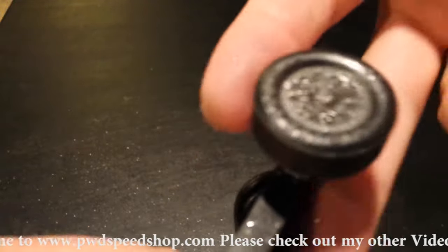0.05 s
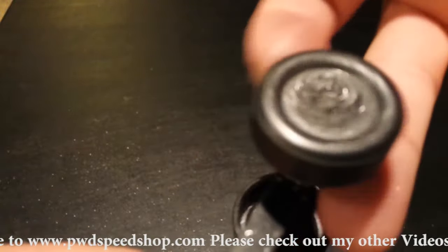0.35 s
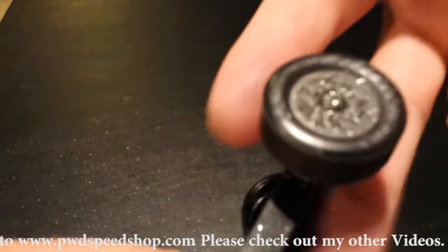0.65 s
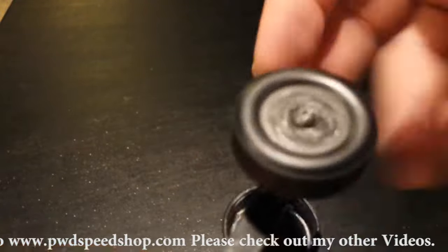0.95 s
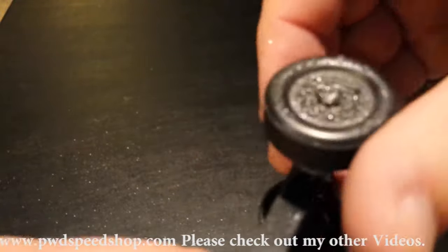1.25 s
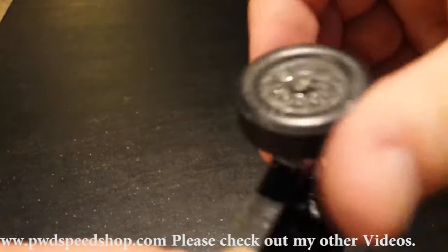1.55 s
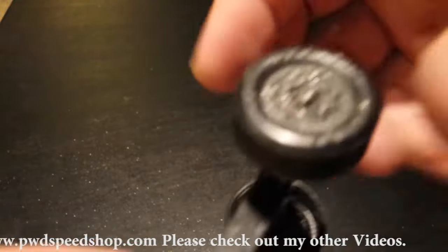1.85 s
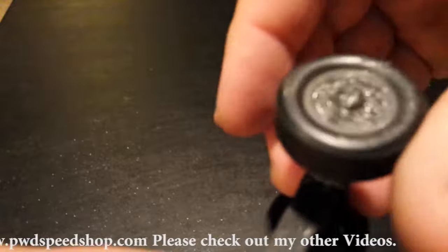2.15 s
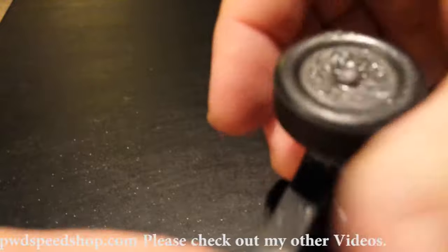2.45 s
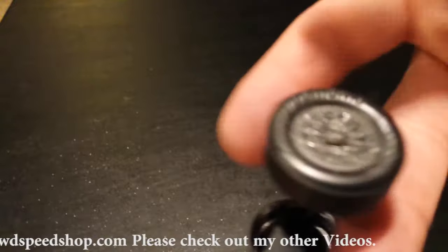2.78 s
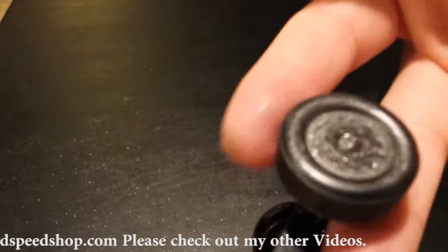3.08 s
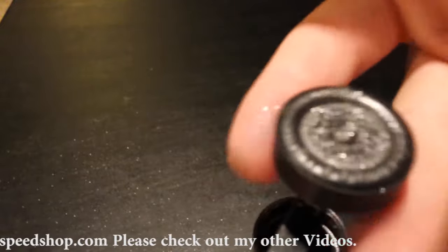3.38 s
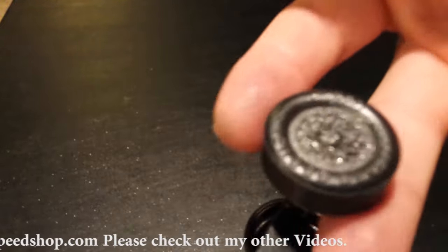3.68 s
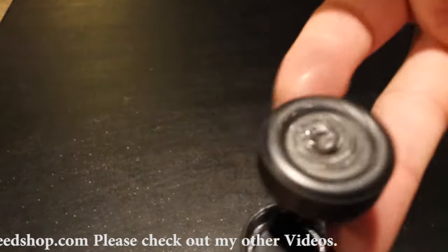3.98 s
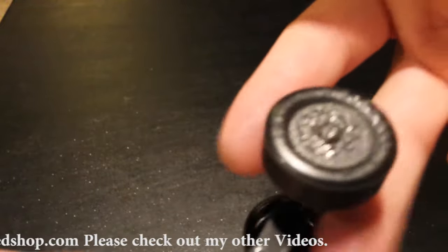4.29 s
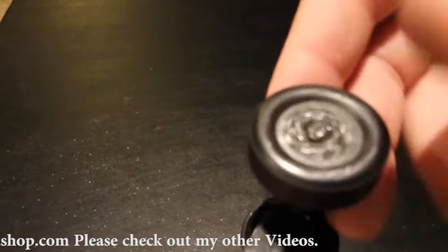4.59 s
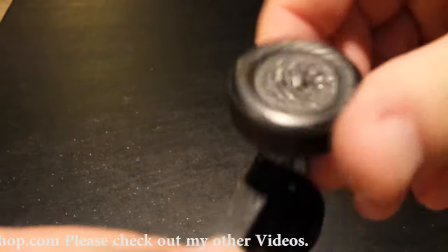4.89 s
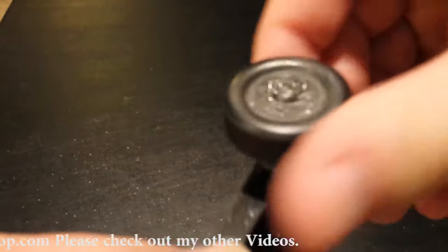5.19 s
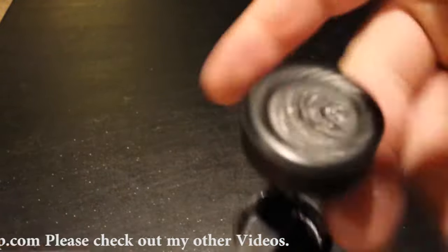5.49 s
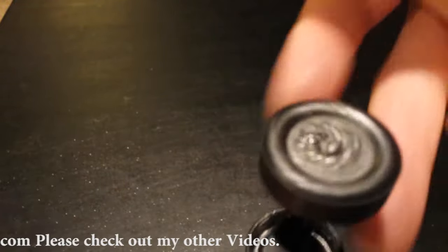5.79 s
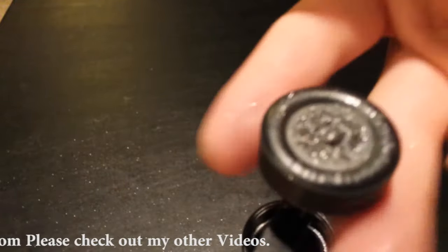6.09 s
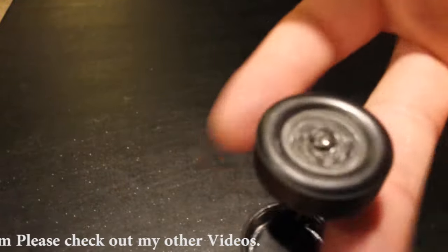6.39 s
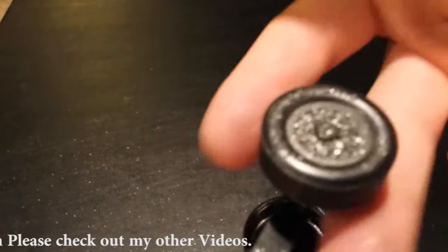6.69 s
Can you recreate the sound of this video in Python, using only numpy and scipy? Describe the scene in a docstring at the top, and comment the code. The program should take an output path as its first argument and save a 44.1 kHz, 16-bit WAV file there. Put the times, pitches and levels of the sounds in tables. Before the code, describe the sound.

Close, sharp irregular clicks of a little plastic wheel knocked along its axle, with gritty powder ticks and one brief soft spin.

```python
"""A plastic wheel worked with graphite

A small plastic wheel sits on a steel axle with dry graphite, close to a camera in a small room.
A fingertip knocks the wheel up its axle; it drops back, rings and bounces. In between, fingers turn it,
the flakes crunch and tick, and once it spins freely with a soft rumble that sinks as it slows."""
import sys
import numpy as np
from scipy import signal
from scipy.fft import rfft, irfft, next_fast_len
from scipy.io import wavfile
from scipy.ndimage import uniform_filter1d, map_coordinates

SR = 44100
rng = np.random.default_rng(int(sys.argv[2]) if len(sys.argv) > 2 else 0)


def transcribe(u):
    """Save the signal u as a 16-bit wav file named by the first command-line argument.

    u: samples, shape (n,) or (channels, n), limited to [-1, 1]; the rate is SR.
    q: integer samples, one column per channel.
    """
    v = np.clip(np.atleast_2d(u).T, -1, 1)
    q = np.round(v * 32767).astype(np.int16)
    wavfile.write(sys.argv[1], SR, q)


N = 297383

# the wheel's ringing tones and how hard each touch drives them: f/Hz, width/Hz, lift/dB, drop/dB, tick/dB
WHEEL = [(1802, 360, 9.5, 14, 12.5), (2167, 46, 8.5, 6, 0.5), (2740, 80, 13, 7.5, 8),
         (3078, 380, 10.5, 13.5, 8), (3776, 95, 2, 16.5, 9.5), (3892, 580, 13, -5, 7),
         (5110, 800, 10.5, 11, 5.5), (6334, 930, 16, 10.5, 2.5), (7430, 760, 12, -2.5, 4.5),
         (8474, 1100, 0, 2.5, 5), (11310, 290, -8, 2, -9), (13650, 530, -14.5, -19, -10)]
# the sound opens on a brief loud rush, then a finger lands on the rim and turns the wheel: t/s, length/s,
# rubbing/dB, hand rumble/dB
STROKES = [(0, 0.041, -50.5, -62), (0.166, 0.093, -57.5, -72.5), (0.279, 0.15, -56.5, -66),
           (0.537, 0.14, -56, -58.5), (0.725, 0.15, -53, -65), (1.076, 0.27, -56.5, -69),
           (1.409, 0.055, -57, -81), (1.546, 0.24, -61.5, -74.5), (1.763, 0.039, -58, -65),
           (2.049, 0.15, -57.5, -65), (2.246, 0.081, -62.5, -74.5), (2.359, 0.077, -57, -70),
           (2.511, .06, -57.5, -67.5), (2.93, 0.087, -61, -63), (3.067, 0.24, -57, -63.5),
           (3.465, 0.32, -61.5, -65), (3.754, 0.16, -57.5, -67), (3.997, .1, -57, -67.5),
           (4.274, 0.15, -56, -68.5), (4.488, 0.17, -57.5, -65), (4.833, 0.3, -53.5, -67.5),
           (5.213, 0.088, -67.5, -85), (5.326, .11, -59, -74.5), (5.498, 0.087, -59, -67.5),
           (5.735, 0.05, -48, -62), (6.294, 0.17, -60, -70.5), (6.685, 0.066, -56, -68)]


def amp(db):
    """Turn decibels into a gain."""
    return 10 ** (np.asarray(db) / 20)


def unit(x):
    """Scale to an average (rms) level of 1."""
    return x / np.sqrt(np.mean(x ** 2) + 1e-20)


def along(points, hz):
    """Read between (f/Hz, value) points on a log frequency axis."""
    f, values = np.transpose(points)
    return np.interp(np.log(hz + 1), np.log(f + 1), values)


def curves(rows):
    """One value per sample for each column after the time."""
    times, *columns = np.transpose(rows)
    return [np.interp(np.arange(N) / SR, times, column) for column in columns]


def wobble(rate):
    """A smooth curve through `rate` random values a second."""
    return map_coordinates(rng.standard_normal(int(N * rate / SR) + 4), [np.arange(N) * rate / SR])


def filtered(x, response):
    """Filter x with a response given as a function of frequency."""
    size = next_fast_len(x.shape[-1] + 8192)
    return irfft(rfft(x, size) * response(np.fft.rfftfreq(size, 1 / SR)), size)[..., :x.shape[-1]]


def causal(db):
    """The fastest-starting response that has these gains on an FFT grid."""
    cepstrum = irfft(np.log(amp(db)))
    half = len(cepstrum) // 2
    return np.exp(rfft(cepstrum * np.r_[1, np.full(half - 1, 2), np.zeros(half)]))


def add(track, s, x):
    """Mix x into the track at s seconds."""
    part = track[..., max(round(s * SR), 0):][..., :x.shape[-1]]
    part += x[..., :part.shape[-1]]


def rush(spectrum, alike):
    """Stereo noise shaped by (f/Hz, level/dB) and (f/Hz, left-right likeness) points."""
    def response(hz):
        angle = np.arccos(np.clip(along(alike, hz), -1, 1)) / 2
        return amp(along(spectrum, hz)) * [np.cos(angle), np.sin(angle)]
    mid, side = filtered(rng.standard_normal((2, N)), response)
    return unit(np.array([mid + side, mid - side]))


def patchy(x, depth_db):
    """Let the colour of a noise shift in patches about 1 kHz wide and 25 ms long."""
    spectra = signal.stft(x, nperseg=256)[2]
    patches = uniform_filter1d(rng.standard_normal(spectra.shape[1:]), size=7, axis=0)
    patches = uniform_filter1d(patches, size=8, axis=1)
    return signal.istft(spectra * amp(depth_db * unit(patches)), nperseg=256)[1][:, :N]


def background(hand, quiet_db):
    """The hands rumble softly with each stroke over the still room."""
    # colour of the hand rumble: f/Hz, level/dB
    handling = [(40, -18.5), (100, -2.5), (200, -3), (320, -3.5), (480, -7), (620, -10.5), (1200, -16),
                (2500, -52)]
    # colour of the still room: f/Hz, level/dB
    quiet = [(15, -23.5), (27, -9.5), (36, 1.5), (50, -8), (150, -6.5), (300, -13), (450, -12.5),
             (700, -18), (1200, -21.5), (4000, -22.5), (8000, -21.5), (14300, -22.5), (16000, -54)]
    # how alike the room sounds left and right: f/Hz, likeness (1 = the same)
    alike = [(60, -0.27), (240, 0.06), (950, -0.26), (3770, -0.16), (15000, -0.0072)]
    return hand * rush(handling, [(200, 0.79)]) + amp(quiet_db) * rush(quiet, alike)


def hums():
    """Two thin, wavering tones hang in the room; the upper one fades faster."""
    # the room's hums: f/Hz, starting level/dB, fade/(dB per s)
    tones = [(313, -78.5, 0.9), (456, -71.5, 6)]
    t = np.arange(N) / SR
    return sum(amp(db - fade * t) * unit(np.sin(2 * np.pi * hz * t + 0.65 * wobble(10)))
               for hz, db, fade in tones)


def room(x, wet_db, wall_db, build_s):
    """Desk and walls echo, along with a soft tail that changes as the hands move."""
    # the wheel aims its main ring at the microphone, so less spills into the room: f/Hz, gain/dB
    spill = [(1500, 2), (3000, -1), (5000, 0.5), (6200, -4.5), (7200, -1), (9000, -2)]
    # how long the tail takes to fall by 60 dB (its t60): f/Hz, t60/s
    decay = [(200, 0.3), (2000, 0.25), (6000, 0.26), (12000, 0.14)]
    # echoes off desk and walls: delay/s, level/dB
    walls = [(.0092, -17.5), (0.0197, -20.5), (0.0215, -28), (0.0657, -40.5), (0.0737, -41.5)]
    out, hop = np.zeros((2, N)), SR // 4
    x = filtered(x, lambda hz: amp(along(spill, hz)))
    for start in range(0, N, hop):
        hz, t, noise = signal.stft(rng.standard_normal((2, SR // 2)), SR, nperseg=256)
        fading = noise * amp(-60 * t / along(decay, hz)[:, None])
        tail = signal.istft(fading * np.minimum(t / build_s, 1), SR, nperseg=256)[1]
        tail = amp(wet_db) * tail / np.linalg.norm(tail[0])
        for delay, db in walls:
            scatter = rng.standard_normal((2, 160)) * np.exp(-np.arange(160) / 35)
            add(tail, delay, amp(db + wall_db) * scatter / np.linalg.norm(scatter[0]))
        add(out, start / SR, signal.fftconvolve(x[:, start:start + hop], tail, axes=1))
    return out


def ports(x):
    """The microphone's two openings each hear the wheel with their own colour and delay."""
    # how loud the left is against the right: f/Hz, gain/dB
    shade = [(200, 6), (1700, -2.5), (2200, 5.5), (3200, -12.5), (4200, 2.5), (5200, 1), (6400, -0.5),
             (7400, -10.5), (9000, -19), (11400, -16), (14000, -14.5)]
    # how far the left trails the right: f/Hz, lag/rad
    lag = [(300, 0.73), (800, 0.21), (1500, 3.565), (4000, 3.77), (5500, 4.63), (7000, 7.65), (10000, 8.2),
           (14000, 11)]
    left = lambda hz: amp(along(shade, hz)) * np.exp(-1j * along(lag, hz))
    return filtered(x, lambda hz: np.array([left(hz), np.ones(len(hz))]))


def wheel_db(hz, drive_db, scatter_db):
    """How strongly the wheel rings at each frequency; every touch varies it a little."""
    # the bare snap between the ringing tones: f/Hz, level/dB
    snap = [(25, -36), (100, -17.5), (500, -2), (1000, 0.5), (1400, 6), (2400, 1.5), (3500, -14),
            (6000, -4.5), (10200, -20), (12500, -23), (15000, -25.5)]
    centre, width = np.transpose(WHEEL)[:2, :, None]
    heights = amp(drive_db + scatter_db * rng.standard_normal(len(WHEEL)))[:, None]
    peaks = heights / (1 + ((hz - centre) / width) ** 2 * 2)
    return 10 * np.log10(np.sum(peaks ** 2, axis=0) + amp(along(snap, hz)) ** 2)


def contact(drive_db, knock_db, edge_db, chatter_db, chatter_t60, size=4096):
    """One click: a snap and a brief chatter of the touching faces ring the wheel."""
    t, hz = np.arange(size) / SR, np.fft.rfftfreq(size, 1 / SR)
    grit = rng.standard_normal(size) + 1.01 * rng.standard_normal((2, size))
    grit *= amp(-60 * t / chatter_t60)
    chatter = rfft(grit / np.linalg.norm(grit[0])) * hz / np.hypot(hz, 900)  # too fine to carry bass
    force = 1 + amp(chatter_db) * chatter
    # where the rim lands sets the share of low knock and of sharp edge
    tilt = [(500, knock_db / 2), (1050, knock_db), (3000, knock_db), (4600, 0), (6500, 0), (7800, edge_db)]
    body = causal(wheel_db(hz, drive_db, scatter_db=1) + along(tilt, hz))
    return unit(ports(irfft(force * body))) * np.sqrt(.01 * SR / size)  # the energy of 10 ms at level 1


def strokes(levels_db, release_t60, grip_s=.025, swell_db=1.5):
    """Finger pressure: each stroke grips, presses harder while it lasts and lets go."""
    out = np.zeros(N)
    for (s, length, *_), db in zip(STROKES, levels_db):
        t = np.arange(int((length + release_t60) * SR)) / SR
        hold_db = swell_db * (np.minimum(t / length, 1) - .5)
        release_db = -60 * np.maximum(t - length, 0) / release_t60
        add(out, s, np.minimum(t / grip_s, 1) * amp(db + hold_db + release_db))
    return out


def spin(chatter_db):
    """The spinning wheel rumbles on its axle; its rough chatter sinks with the speed."""
    # the free spin: t/s, rumble level/dB, chatter f/Hz
    coasting = [(4.77, -89.5, 567), (4.82, -60.5, 540.8), (4.9, -66, 470), (4.97, -61, 446.4),
                (5.06, -66, 397), (5.2, -88, 360)]
    level_db, chatter_hz = curves(coasting)
    phase = 2 * np.pi * np.cumsum(chatter_hz * (1 + .07 * wobble(130))) / SR
    chatter = unit(np.sin(phase) + 1.1 * np.sin(phase / 2)) * amp(2.2 * wobble(55))
    colour = [(60, -37), (150, -1.0), (220, 9.0), (400, 4.5), (700, -13.0), (1300, -46.5), (4000, -73)]
    rumble = rush(colour, alike=[(300, 0.89)])
    return amp(level_db) * (rumble + amp(chatter_db) * chatter)


def crunch(rub, hiss_db, grit_db, grains_per_s, spread_db):
    """Skin slides on powder in uneven scratches while tiny flakes break in clumps and ring the wheel."""
    # colour of skin rubbing on powder: f/Hz, level/dB
    colour = [(350, -47.5), (600, -12.5), (1010, -13), (1310, -9), (1700, -10), (2400, -14), (3430, -4),
              (3730, -6), (4710, -13), (7730, 1), (9000, -2.5), (10000, -7.5), (12200, -15), (13900, -10.5),
              (14700, -28.5), (16000, -75.5)]
    *_, tick_db = np.transpose(WHEEL)
    skin = patchy(rng.standard_normal(N) + 1.8 * rng.standard_normal((2, N)), depth_db=1.5)
    scratch_db = 1.8 * wobble(50) + 1.8 * wobble(370)
    hiss = unit(ports(filtered(skin, lambda hz: amp(along(colour, hz)))) * amp(scratch_db))
    breaks = rng.random(N) < grains_per_s / SR * amp(6 * wobble(35))
    flakes = breaks * rng.choice([-1, 1], N) * amp(spread_db * np.minimum(rng.exponential(size=N), 3))
    grit = unit(ports(filtered(flakes, lambda hz: amp(wheel_db(hz, tick_db, scatter_db=7.5)))))
    return rub * (amp(hiss_db) * hiss + amp(grit_db) * grit)


def cracks(rub, per_s, gain_db, spread_db, knock_db, edge_db):
    """Flakes crack under the finger, each in its own colour and louder the harder it presses."""
    *_, tick_db = np.transpose(WHEEL)
    out = np.zeros((2, N))
    for when, strength, colour in rng.random((int(per_s * N / SR), 3)):
        at, swing_db = int(when * N), 12 * (colour - .5)
        click = contact(tick_db, knock_db - swing_db, edge_db + swing_db, chatter_db=4, chatter_t60=.006)
        add(out, at / SR, rub[at] * amp(gain_db + spread_db * (strength - 1.0)) * click)
    return out


def ticks():
    """The wheel scuffs its axle and crushes the larger flakes: mostly chatter, little snap."""
    # each scuff or broken flake: t/s, level/dB, low knock/dB, sharp edge/dB
    scuffs = [(.004, -31.5, -2, 2), (0.5908, -41, -1, 1), (1.097, -51.5, 4, 10), (1.1438, -37.5, 4, 3),
              (1.2867, -40, -25, 12.5), (1.73, -47, 0, 16), (1.766, -37, -2.5, 8), (1.8143, -36, 5, -3),
              (1.8228, -37.5, 2, 1), (2.088, -40.5, 1.5, 10.5), (2.1064, -32.5, -8, -9.5),
              (2.2521, -40, -2, -7), (2.4251, -50.5, 1.5, -9), (2.5415, -46, -3, 13),
              (2.5493, -35.5, 8, -8), (2.5946, -42.5, 0, -20), (4.068, -41, -20, 15), (4.388, -44, -1, -7),
              (4.542, -40.5, -31, -1), (4.803, -52, 4.5, 5), (4.834, -49.5, -11, 9), (4.8941, -36, 0, 0),
              (4.98, -32.5, -7.5, -1), (4.9963, -45, -11, 30), (5.5665, -40, 3, -5),
              (5.5723, -40.5, 0.5, -20), (5.795, -37, -6.5, 3), (6.3492, -36, -9, 13),
              (6.4133, -37.5, -15, 14), (6.7084, -40, 1, -3.5)]
    *_, tick_db = np.transpose(WHEEL)
    out = np.zeros((2, N))
    for s, db, knock_db, edge_db in scuffs:
        add(out, s, amp(db) * contact(tick_db, knock_db, edge_db, chatter_db=10.5, chatter_t60=.013))
    return out


def drops(loss_db, rebound=.65, knock_db=-4.5):
    """The wheel falls back, rings and bounces twice, each flight shorter and each landing softer."""
    # each fall: t/s, level/dB, sharp edge/dB, first flight/s, first bounce against the fall/dB
    falls = [(0.4042, -23, -1, .011, -6.5), (.680, -23.5, -8, 0.011, -9), (0.9024, -22, -1, 0.0081, -11.5),
             (2.571, -23.5, 4.5, 0.0063, -18), (2.988, -23.5, 1, .01, -9), (3.1291, -22.5, 5, .013, -19),
             (3.289, -28, -2.5, 0.013, -5), (3.5882, -24.5, -2, 0.011, -10), (3.7548, -22, 4, 0.0096, -10),
             (3.8914, -23, 3, 0.012, -10.5), (4.0919, -24, 3.5, .0116, -11.5),
             (4.3978, -23.5, -1, .0084, -15.5), (4.6086, -27, -1, .012, -9),
             (5.8249, -20.5, 2.5, 0.013, -12), (6.2424, -27, 3.5, .0115, -6),
             (6.5085, -27.5, 2.5, 0.0085, -7)]
    *_, drop_db, _ = np.transpose(WHEEL)
    out = np.zeros((2, N))
    for s, db, edge_db, flight, bounce_db in falls:
        landings = [(s, db), (s + flight, db + bounce_db),
                    (s + flight * (1 + rebound), db + bounce_db - loss_db)]
        for when, level_db in landings:
            click = contact(drop_db, knock_db, edge_db, chatter_db=-1.5, chatter_t60=.009)
            add(out, when, amp(level_db) * click)
    return out


def slide(length, stop_t60, fade_db):
    """The wheel catches on the axle and scrapes along it, ever more lightly, until it hits its stop."""
    *_, tick_db = np.transpose(WHEEL)
    t = np.arange(SR // 40) / SR
    onset = np.minimum(t / (0.075 * length), 1)
    easing_db = fade_db * (.5 - np.minimum(t / length, 1))
    stop_db = -60 * np.maximum(t - length, 0) / stop_t60
    colour = lambda hz: amp(wheel_db(hz, tick_db, scatter_db=2.5)) * hz / np.hypot(hz, 1400)
    scrape = ports(filtered(rng.standard_normal(len(t)), colour))
    return unit(scrape) * onset * amp(easing_db + stop_db)


def lifts():
    """A finger knocks the wheel up and stays on it, so these blows chatter and do not bounce."""
    # each blow: t/s, level/dB, low knock/dB, sharp edge/dB, slide before it/s, slide level/dB
    blows = [(0.1002, -20, -1, 1, 0.003, -41.5), (0.1598, -13.5, -2, 3.5, 0.0037, -21.5),
             (0.5381, -19.5, -0.5, 1, 0.0056, -19.5), (0.7448, -18.5, 2.5, 4, 0.006, -28.5),
             (2.9252, -20, -0.5, 3.5, 0.0065, -42), (3.0717, -21, 0, 17.5, 0.0085, -30),
             (3.1561, -19, -1.5, 0.5, 0.0045, -42), (3.4429, -16.5, -1, 8, 0.0048, -23),
             (3.6681, -20, 2, -3, 0.0063, -24), (3.8136, -27.5, 8, 8.5, 0.0085, -35),
             (3.981, -21.5, -6, 6, 0.0017, -65.5), (4.2937, -20, 0, 1, 0.0072, -32),
             (4.4727, -19, 1, 1, 0.0036, -49), (5.731, -22.5, 2.5, 1, 0.0085, -26),
             (6.1278, -20, -4, 7, 0.0023, -53), (6.2871, -20.5, 0.5, 8.5, 0.0067, -24.5),
             (6.6559, -19.5, 1, 4.5, 0.0064, -27.5)]
    _, _, lift_db, _, _ = np.transpose(WHEEL)
    out = np.zeros((2, N))
    for s, db, knock_db, edge_db, length, slide_db in blows:
        add(out, s - length, amp(slide_db) * slide(max(length, .001), stop_t60=0.0023, fade_db=5))
        add(out, s, amp(db) * contact(lift_db, knock_db, edge_db, chatter_db=1.5, chatter_t60=.012))
    return out


def scene():
    """Mix the wheel, the hands and the room."""
    _, _, rub_db, hand_db = np.transpose(STROKES)
    rub = strokes(rub_db, release_t60=0.23)  # the rubbing stops quickly
    hand = strokes(hand_db, release_t60=0.74)  # the hand settles slowly
    knocks = lifts()
    rattles = drops(loss_db=12.5) + ticks()
    echoes = room(knocks, wet_db=-21, wall_db=-1.5, build_s=0.024)
    echoes += room(rattles, wet_db=-22, wall_db=-1.0, build_s=0.0062)
    turning = crunch(rub, hiss_db=1.5, grit_db=-9.0, grains_per_s=500, spread_db=4) + spin(chatter_db=-2.0)
    flakes = cracks(rub, per_s=38, gain_db=-0.5, spread_db=11, knock_db=-7, edge_db=8.5)
    return knocks + rattles + echoes + turning + flakes + background(hand, quiet_db=-67) + hums()


def record(dry):
    """The camera rounds off the highest peaks and cuts the very top of the treble."""
    rounded = dry / (1 + np.abs(dry / .9) ** 6) ** (1 / 6)
    return filtered(rounded, lambda hz: np.interp(hz, [14400, 14900, 16400, 16600], [1, .3, .15, 0]))


dry = scene()
out = record(dry)
transcribe(out)
```